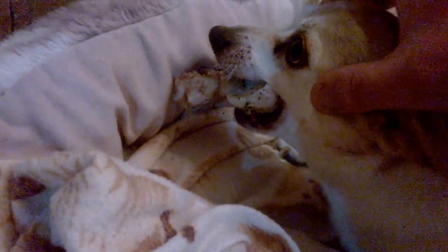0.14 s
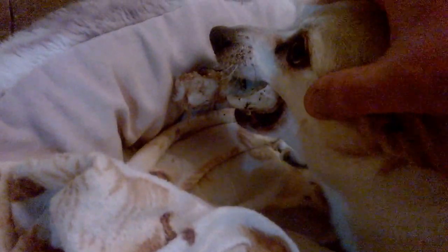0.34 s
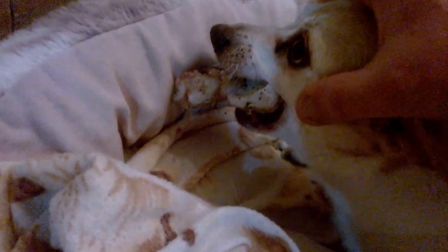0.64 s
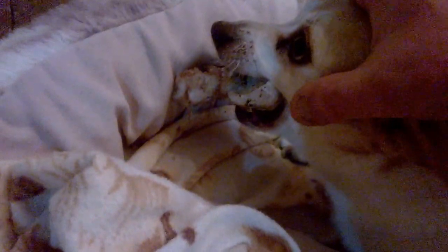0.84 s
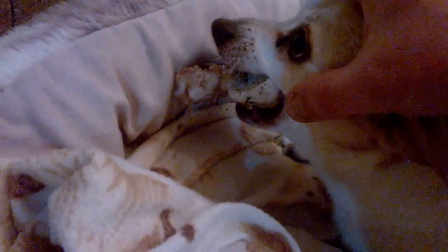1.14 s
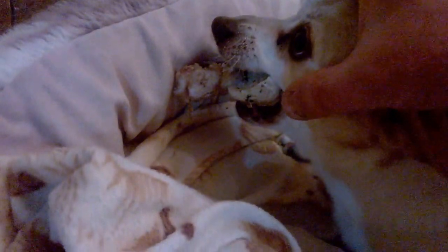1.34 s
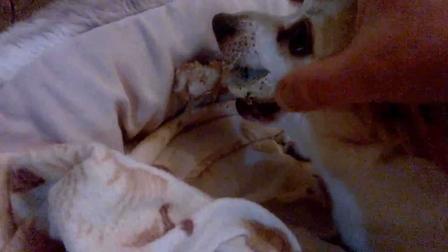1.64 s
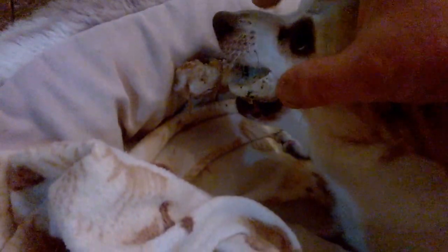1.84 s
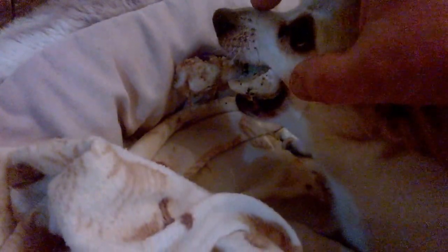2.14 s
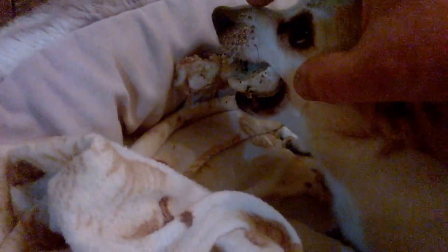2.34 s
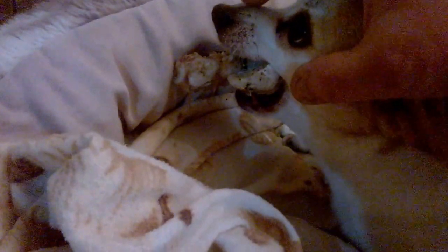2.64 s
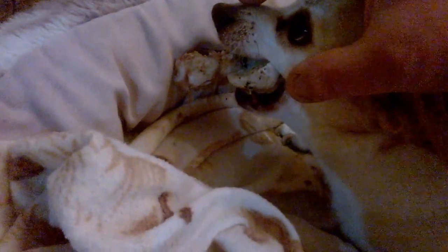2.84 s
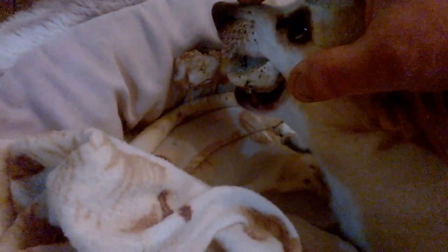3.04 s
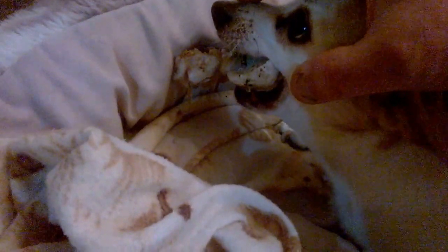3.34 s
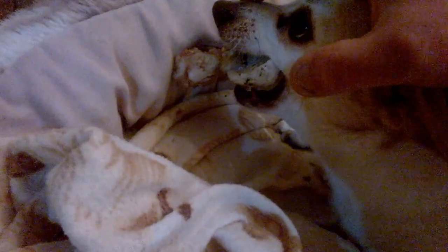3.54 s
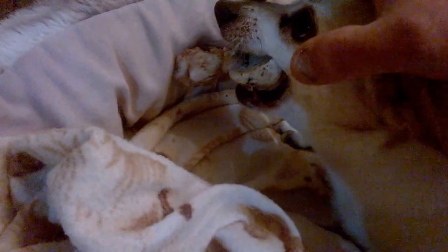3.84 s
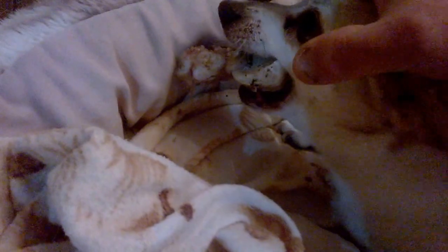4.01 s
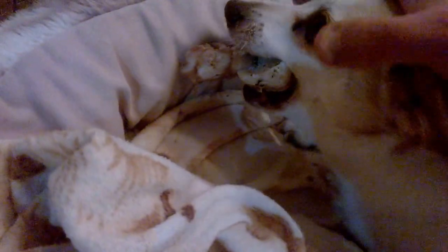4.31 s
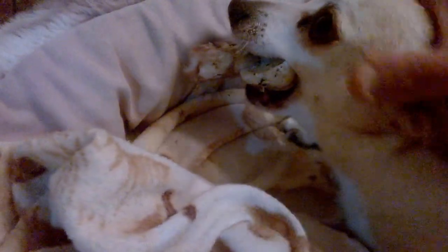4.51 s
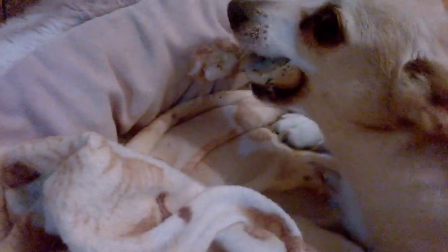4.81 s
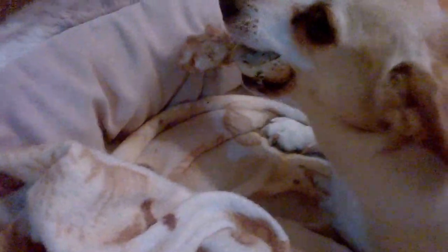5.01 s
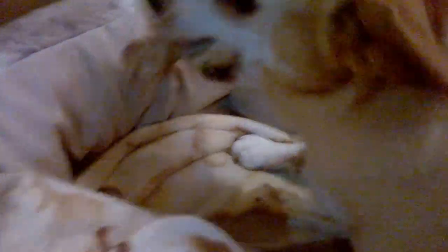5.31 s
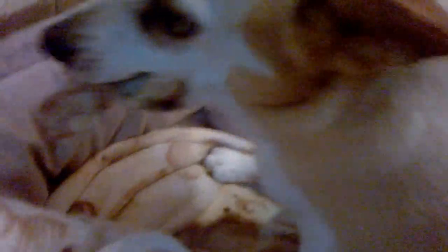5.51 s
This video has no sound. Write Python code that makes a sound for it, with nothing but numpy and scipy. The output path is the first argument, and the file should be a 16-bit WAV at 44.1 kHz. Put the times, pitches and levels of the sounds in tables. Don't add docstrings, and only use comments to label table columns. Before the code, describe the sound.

A small dog growls over a bone, very close to the microphone, in a quiet bedroom with faint muffled echo and soft steady noise. The growl is already under way at 0 s: a low hum fluttering about twenty times a second, with ringing mouth tone and light rasp, stopping near 0.55 s. A flapping nasal snort snatches air around 0.65 s. A longer growl runs from 0.9 to 1.87 s, swelling and cracking briefly upward at its end, followed by the strongest snort near 1.97 s. The third growl, 2.15 to 3.15 s, flutters steadily, then a quieter snort at 3.25 s. The fourth starts at 3.45 s and leaps into a loud, higher yelp around 4.04 s, dying by 4.24 s with a small gulp of air. A short growl at 4.5 to 4.76 s ends abruptly; a weak gulp and faint sigh follow. A tiny grunt at 5.15 s leads to sniffs near 5.28 and 5.6 s.

```python
import sys
import numpy as np
from scipy import signal
from scipy.fft import rfft, irfft, next_fast_len
from scipy.io import wavfile
from scipy.ndimage import uniform_filter1d

SR = 44100
rng = np.random.default_rng(int(sys.argv[2]) if len(sys.argv) > 2 else 0)


def dump(signal):
    limited = np.clip(np.atleast_2d(signal).T, -1, 1)
    pcm = np.round(limited * 32767).astype(np.int16)
    wavfile.write(sys.argv[1], SR, pcm)


def field_ratio(decibels):
    return 10 ** (np.asarray(decibels, dtype=float) / 20)


N = 249606


def in_time(rows):
    s, *columns = np.transpose(rows)
    return [np.interp(np.arange(N) / SR, s, column) for column in columns]


def evened(x, seconds):
    return x / np.sqrt(uniform_filter1d(x ** 2, int(seconds * SR)) + 1e-20)


def filtered(x, order, hz, kind="low"):
    return signal.sosfilt(signal.butter(order, hz, kind, fs=SR, output="sos"), x)


def drift(rate_hz):
    slow = filtered(rng.standard_normal(N + 9000), 2, rate_hz)[9000:]
    return slow / slow.std()


def resonate(x, modes):
    out = 0
    for k, (hz, width, db) in enumerate(modes):
        r = np.exp(-np.pi * 1.5 * max(width, hz / 22) / SR)
        section = [(1 - r * r) / 2, 0, (r * r - 1) / 2, 1, -2 * r * np.cos(2 * np.pi * hz / SR), r * r]
        out = out + (-1) ** k * field_ratio(db) * signal.sosfilt([section, section], x)
    return out


def coloured(spectrum, flicker_db):
    hz, db = np.transpose(spectrum)
    edges = 30 * 2 ** np.arange(0, 9.1, 1 / 3)
    white = rng.standard_normal((2, N))
    out = 0
    for k, (low, high) in enumerate(zip(edges, edges[1:])):
        level_db = np.interp(np.log(low * high) / 2, np.log(hz), db, left=-90)
        if level_db > -80:
            band = filtered(white[k % 2], 2, [low, high], "band")
            out = out + field_ratio(level_db + flicker_db * drift(30)) * band
    return out / out.std()


def puffs(rows, edge_db, roundness):
    t, gain = np.arange(N) / SR, 0
    for start, top, end, db in rows:
        away = np.interp(t, [start - .1, start, top, end, end + .1], [4, 1, 0, 1, 4])
        gain = gain + field_ratio(db - edge_db * away ** roundness)
    return gain


# (f/Hz, level per Hz/dB)
FLOOR_COLOUR = [(18, -36), (30, 2.5), (167, 6), (2250, -19), (3780, -34.5), (4200, -22), (6040, -54),
                (6880, -21.5), (12200, -36), (15000, -36)]


def background():
    return field_ratio(-65.5) * coloured(FLOOR_COLOUR, flicker_db=5.5)


ECHO_LAGS = [.0137, .0163, .0191, .0223, .0251, .0287, .0319, .0361, .0397, .0443]


def bedroom(x):
    t60_s, wall_cut_hz, bedding_cut_hz = 0.59, 950, 1700
    size = next_fast_len(N + SR)
    hz = np.fft.rfftfreq(size, 1 / SR)
    echo = 0
    for k, lag in enumerate(ECHO_LAGS):
        delay = np.exp(-2j * np.pi * hz * lag)
        loop = field_ratio(-60 * lag / t60_s) * delay / (1 + 1j * hz / wall_cut_hz) ** 0.14
        echo = echo + (-1) ** k * loop / (1 - loop)
    return irfft(rfft(x, size) * echo / (1 + 1j * hz / bedding_cut_hz), size)[:N]


# (from t/s, loudest t/s, until t/s, level/dB)
SIGH_TIMES = [
    (4.87, 4.93, 5.03, -66.5),
]
# (f/Hz, width/Hz, level/dB)
SIGH_RESONANCES = [(2440, 280, 16), (3930, 320, 2), (5126, 3500, -13)]


def sigh():
    breath = evened(resonate(rng.standard_normal(N), SIGH_RESONANCES), seconds=0.071)
    return puffs(SIGH_TIMES, edge_db=14, roundness=1.5) * breath


# (from t/s, loudest t/s, until t/s, level/dB)
SNIFF_TIMES = [
    (5.195, 5.275, 5.375, -45),
    (5.33, 5.43, 5.73, -69.5),
    (5.555, 5.585, 5.723, -50.5),
]
# (f/Hz, level per Hz/dB)
SNIFF_COLOUR = [(240, -33), (400, 0), (473, -17), (822, 7), (874, -41), (1260, 3), (1740, -2), (2190, -1),
                (4860, -0.5), (11800, -9), (15600, -36)]


def sniffs():
    return puffs(SNIFF_TIMES, edge_db=26, roundness=3.4) * coloured(SNIFF_COLOUR, flicker_db=2.4)


# (from t/s, loudest t/s, until t/s, level/dB)
GULP_TIMES = [
    (.58, .65, 0.69, -43.5),
    (1.91, 1.97, 2.036, -39.5),
    (3.19, 3.26, 3.296, -47.5),
    (4.24, 4.325, 4.358, -53),
    (4.76, 4.805, 4.886, -55),
]
# (f/Hz, level per Hz/dB)
GULP_COLOUR = [(880, 5), (1500, 4.5), (1960, -11), (3030, 7.5), (4250, -5), (4810, 0.5), (5890, -1),
               (6360, -9.5), (11800, -11), (15000, -61)]
# (f/Hz, width/Hz, level/dB)
NOSTRIL_RESONANCES = [(2920, 390, 0), (3700, 490, 0)]


def nose_gulps():
    hiss = puffs(GULP_TIMES, edge_db=33.5, roundness=2.44) * coloured(GULP_COLOUR, flicker_db=7.5)
    ring = evened(resonate(rng.standard_normal(N), NOSTRIL_RESONANCES), seconds=0.3)
    return hiss + puffs(GULP_TIMES, edge_db=10.5, roundness=2.5) * field_ratio(-6) * ring


# (f/Hz, width/Hz, level/dB)
MOUTH_RESONANCES = [(565, 270, -1.5), (952, 166, 9.5), (1095, 43.4, 8), (1195.4, 73.3, 9), (1567, 124, -12),
                    (1780, 2060, -19.5)]
# (f/Hz, width/Hz, level/dB)
LIPS_DOWN = [(2367, 253, 3), (3550, 295, 1.5), (4844, 416, 2.5), (6150, 690, -6.5), (7220, 133, -7),
             (8220, 140, -15), (10470, 1170, -11.5), (12780, 980, -22.5)]
# (t/s, peak level/dB, thump level/dB)
PALATE_FLAPS = [(0.623, -25.5, -58.5), (0.639, -29, -54.5), (0.654, -41, -54), (1.952, -21.5, -52.5),
                (1.973, -22.5, -57), (1.994, -29, -59.5), (3.244, -39, -62), (3.26, -31, -60.5),
                (3.274, -33, -60), (4.287, -47, -70), (5.102, -80, -81), (5.268, -53, -63),
                (5.287, -50, -70), (5.579, -70, -82.5)]


def palate_flaps():
    s, peak_db, thump_db = np.transpose(PALATE_FLAPS)
    at = np.round(s * SR).astype(int)
    knock, thump = np.full((2, N), 1e-18)
    knock[at] = field_ratio(peak_db + 2.5)
    thump[at] = field_ratio(thump_db + 60.5)
    puff = signal.lfilter([1], [1, -.9965], uniform_filter1d(knock, size=80, origin=39))
    burst = resonate(puff * rng.standard_normal(N), MOUTH_RESONANCES)
    crack = signal.lfilter([1], [1, -.97], knock) * rng.standard_normal(N)
    click = field_ratio(-20) * resonate(crack, LIPS_DOWN)
    soft = uniform_filter1d(thump, size=110, origin=54)
    low = resonate(soft, [(106.5, 65, 14.0), (320, 346, 16.5)])
    return burst + click + low


# (voice sets in t/s, voice stops t/s, chest tone level/dB, rasp level/dB, lip lift 0-1)
GROWL_TIMES = [
    (-.03, 0.552, -24, -44, 0.34),
    (.874, 1.873, -23.5, -44, 0.28),
    (2.151, 3.168, -23.5, -43.5, 1),
    (3.457, 4.241, -23, -43.5, 1),
    (4.481, 4.762, -22.5, -42, 0.62),
    (5.128, 5.222, -22, -74, 0.45),
]


def voiced(levels_db, swell_db, swell_s, fades):
    t, gain = np.arange(N) / SR, 0
    for (start, *_), db, (stop, db_per_s) in zip(GROWL_TIMES, levels_db, fades):
        swell = swell_db * np.exp(-np.maximum(t - start, 0) / swell_s)
        gain = gain + (t > start) * field_ratio(db - swell - db_per_s * np.maximum(t - stop, 0))
    return uniform_filter1d(gain, size=200)


# (first t/s, last t/s, level dip/dB, pitch dip/%)
FLUTTER_RUNS = [
    (0.065, 0.491, -2.5, -8),
    (0.936, 0.98, -3, -16),
    (1.023, 1.424, -3.5, -13),
    (1.494, 1.616, -1, -3),
    (1.67, 1.776, -2.5, -11.5),
    (2.216, 3.053, -3.5, -12),
    (3.52, 3.917, -4, -13),
    (4.522, 4.62, -3, -13),
    (4.762, 4.764, -2, -15),
    (5.171, 5.17, -6.5, -12),
]
# (t/s, extra level dip/dB)
VOICE_CATCHES = [(0.106, -2), (.402, -3.5), (0.493, -4.5), (1.073, -3.5), (1.269, -2), (1.42, 1),
                 (2.264, -6), (2.856, -5.5), (3.091, -2.5), (3.146, -9), (3.568, -4), (4.7, -2)]


def flutter(half_width_s):
    beat_s, slowing, spread = .049, .05, .15
    marks = np.zeros((2, N))
    for first, last, *dips in FLUTTER_RUNS:
        along = np.linspace(0, 1, max(round((last - first) / beat_s), 0) + 1)
        s = first + (last - first) * (along - slowing * along * (1 - along))
        depths = dips * np.exp(spread * rng.standard_normal((len(s), 2)))
        marks[:, (s * SR).astype(int)] = np.transpose(depths)
    stumbles = [(row[0] + 0.028, -9) for row in GROWL_TIMES[1:4]]
    for s, db in list(VOICE_CATCHES) + stumbles:
        marks[0, int(s * SR)] += db
    bell = np.hanning(2 * int(half_width_s * SR) + 1)
    dip_db, dip_percent = signal.fftconvolve(marks, bell[None], "same", axes=1)
    return dip_db, dip_percent / 100


# (t/s, pitch f/Hz, level above usual/dB)
VOICE_EFFORT = [(0, 148, -3), (.38, 161, 1.5), (.53, 160, -0.5), (.95, 151, 0.5), (1.38, 151, -1.5),
                (1.58, 166, 3), (1.69, 158, 1.5), (1.8, 165, 0.5), (2.25, 154, 1.5), (2.55, 149, -0.5),
                (2.8, 152, -1), (3.1, 159, 1), (3.55, 151, 0.5), (3.93, 159, 1), (4.2, 148, -0.5),
                (4.5, 148, 0), (4.68, 157, -1.5), (5.16, 143, -4)]
# (top t/s, climb t/s, fall t/s, top f/Hz, extra level/dB)
YELP_ARCHES = [
    (1.858, .055, .06, 246.8, 3.5),
    (4.04, .095, .17, 368.5, 10.5),
]
# (t/s, extra level/dB)
AIR_SURGES = [
    (.458, 3),
    (1.834, 6),
    (1.86, 4),
    (3.1, -0.5),
    (3.9, 1.5),
    (4.005, 4.5),
    (4.775, 6.5),
]


def voice_pitch():
    t, (hz, db) = np.arange(N) / SR, in_time(VOICE_EFFORT)
    for top, climb, fall, top_hz, louder_db in YELP_ARCHES:
        arch = np.sin(np.interp(t, [top - climb, top, top + fall], [0, np.pi / 2, np.pi])) ** 2
        hz = hz + arch * (top_hz - hz)
        db = db + arch * louder_db
    for s, surge_db in AIR_SURGES:
        db = db + surge_db * np.exp(-((t - s) / 0.0087) ** 2)
    ends = []
    for start, stop, *_ in GROWL_TIMES:
        ends += [(start, 0, stop - start), (stop, stop - start, 0)]
    since, until = in_time(ends)
    scoop = .17 * np.exp(-since / .035)
    sag = .17 * np.exp(-until / .025)
    return hz * (1 - scoop - sag), db


# (pitch f/Hz, level against the chest tone/dB)
FIRST_HARMONIC = [(125, -3.5), (150, 0.5), (190, -1.5), (245, 0.5), (350, -4)]
# (pitch f/Hz, level against the chest tone/dB)
SECOND_HARMONIC = [(130, -15), (148, -17), (162, -20.5), (185, -8.5), (250, -37.5), (300, -17.5), (370, -8)]


def chest_tones(steady_hz, cycles, dip_db, rough):
    _, stops, chest_db, _, _ = np.transpose(GROWL_TIMES)
    cut = [(s, 2496) for s in stops]
    first = voiced(chest_db, 18, 0.013, cut) * field_ratio(np.interp(steady_hz, *np.transpose(FIRST_HARMONIC)))
    second = voiced(chest_db, 22.5, 0.016, cut) * field_ratio(np.interp(steady_hz, *np.transpose(SECOND_HARMONIC)))
    very_rough = np.maximum(rough - .4, 0)
    chest = first * field_ratio(2.34 * dip_db) * np.sin(2 * np.pi * cycles)
    second = second * field_ratio(2.5 - 0.13 * dip_db - 16 * very_rough) * field_ratio(drift(52))
    chest += second * np.sin(4 * np.pi * cycles + 1.3)
    chest *= field_ratio(very_rough * (7.5 * drift(60) - 14.5))
    rumble = first * rough ** 3 * field_ratio(-13.5) * drift(85)
    return np.sqrt(2) * chest + rumble, first


def vocal_folds(cycles, rough):
    shaken = cycles + .055 * rough * drift(70)
    closure = np.diff(np.maximum.accumulate(np.floor(shaken)), prepend=0)
    pulses = closure * field_ratio(5 * rough * drift(90)) * np.sqrt(SR / 150)
    gate = np.exp(.55 * np.cos(2 * np.pi * (shaken - .12)))
    air = gate * rng.standard_normal((2, N)) / 1.15
    air[0] = filtered(air[0], 1, 900, "high")
    return pulses, air


# (multiple of the pitch, level against the mouth band/dB)
LOW_OVERTONES = [(3, -7), (4, -8)]
# (fading starts t/s, mouth fall/dB per s, rasp fall/dB per s)
GROWL_FADES = [
    (.53, 339, 394),
    (1.866, 602, 492),
    (3.132, 403, 396),
    (4.199, 175, 264),
    (4.78, 700, 390),
    (5.233, 176, 600),
]


def mouth_ring(pulses, air, rough, steady_hz, pitch_hz, cycles, effort_db, dip_db):
    mouth = evened(resonate((1 - rough) * pulses + rough * air, MOUTH_RESONANCES), seconds=.05)
    mouth = signal.lfilter(*signal.iirnotch(790, 5, fs=SR), mouth)
    slack_db = 0.3766 * np.clip(153.2 - steady_hz, 0, 25)
    for multiple, level_db in LOW_OVERTONES:
        below = 1 / (1 + (multiple * pitch_hz / 760) ** 8)
        db = level_db + slack_db - (1 - 0.13) * effort_db + .35 * dip_db + 2 * drift(30)
        tone = np.sin(multiple * (2 * np.pi * cycles + 1.3))
        mouth += below * (1 - rough) * field_ratio(db) * tone
    open_jaws = evened(resonate(pulses, [(1970, 1800, 0)]), seconds=0.09)
    mouth += (1 - rough) ** 8 * field_ratio(3.5) * open_jaws
    mouth *= voiced([-35] * len(GROWL_TIMES), 18, 0.027, [row[:2] for row in GROWL_FADES])
    return field_ratio(effort_db + 1.6 * drift(10.6)) * mouth


# (f/Hz, width/Hz, level/dB)
LIPS_UP = [(2508, 306, -2), (3643, 132, -6), (5030, 1120, -14), (6150, 160, -13), (6810, 390, -8.5),
           (8280, 150, -26), (10430, 1160, -18.5), (12400, 1100, -27.5)]


def lip_rasp(pulses, air, rough, first, effort_db, dip_db):
    lifts = [(s, row[4]) for row in GROWL_TIMES for s in row[:2]]
    lift = np.clip(in_time(lifts)[0], 0, 1)
    hiss = 1.3 * (1 - rough) ** 5 * pulses + (.3 + rough) * air * field_ratio(1.5 * drift(40))
    rasp = (1 - lift) * resonate(hiss, LIPS_DOWN) + lift * resonate(hiss, LIPS_UP)
    rasp = evened(rasp, seconds=0.02)
    low_rasp = signal.sosfiltfilt(signal.butter(4, 2950, fs=SR, output="sos"), rasp)
    step = 1 / (.055 * SR)
    flow = signal.lfilter([step], [1, step - 1], first > .004, zi=[1])[0]
    rasp = low_rasp + flow ** 3 * (rasp - low_rasp) * field_ratio(0.32 * dip_db + 1.24 * drift(34))
    rasp_db = [row[3] for row in GROWL_TIMES]
    rasp *= voiced(rasp_db, 52.5, 0.0074, [row[::2] for row in GROWL_FADES])
    return rasp * field_ratio(0.76 * effort_db)


# (t/s, roughness 0-1)
FOLD_ROUGHNESS = [(0, .33), (1.78, .28), (1.83, .52), (2.0, .55), (2.1, .3), (3.93, .3), (3.975, .75),
                  (4.02, .78), (4.033, .15), (4.08, .22), (4.11, .75), (4.4, .6), (4.47, .32), (4.735, .3),
                  (4.775, .75), (5.1, .36), (5.2, .42), (5.24, .8)]


def growl():
    dip_db, dip = flutter(half_width_s=0.021)
    rough, = in_time(FOLD_ROUGHNESS)
    steady_hz, effort_db = voice_pitch()
    pitch_hz = steady_hz * (1 + 1.1 * dip)
    cycles = np.cumsum(pitch_hz) / SR
    chest, first = chest_tones(steady_hz, cycles, dip_db, rough)
    pulses, air = vocal_folds(cycles, rough)
    mouth = mouth_ring(pulses, air[0], rough, steady_hz, pitch_hz, cycles, effort_db, dip_db)
    return chest + mouth + lip_rasp(pulses, air[1], rough, first, effort_db, dip_db)


def scene():
    floor = background()
    dog = sigh() + sniffs() + nose_gulps() + palate_flaps() + growl()
    return (floor + field_ratio(-24) * bedroom(dog) + dog)[None]


def roll_off(x):
    return signal.sosfilt(signal.butter(12, 15710, fs=SR, output="sos"), x)


def record(dry):
    mix = filtered(dry, 2, 42, "high")
    return roll_off(mix)


dry = scene()
out = record(dry)
dump(out)
```